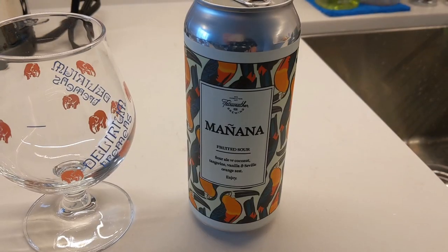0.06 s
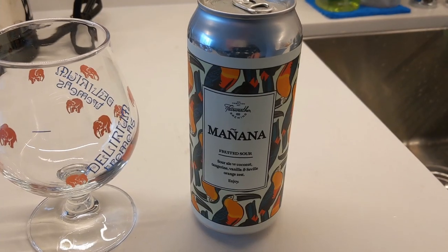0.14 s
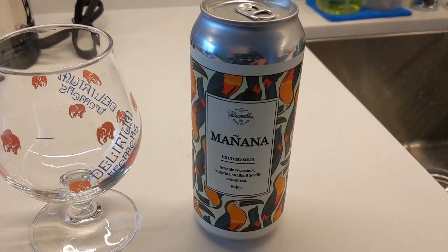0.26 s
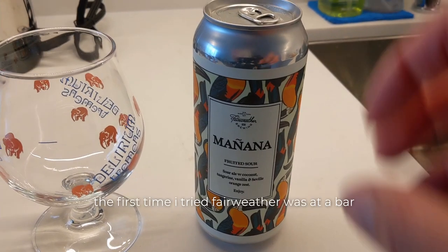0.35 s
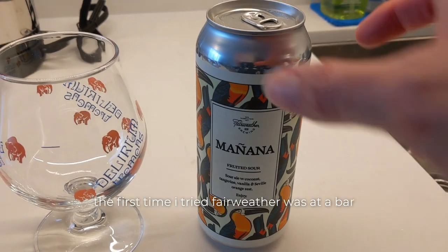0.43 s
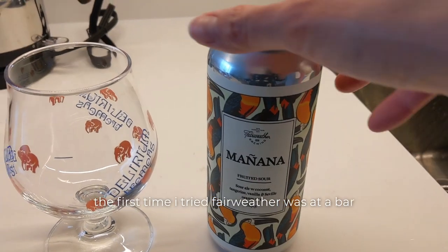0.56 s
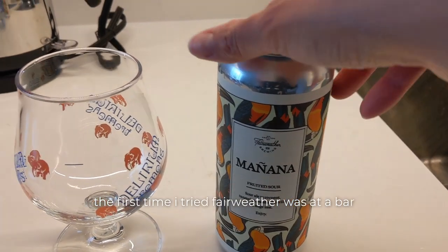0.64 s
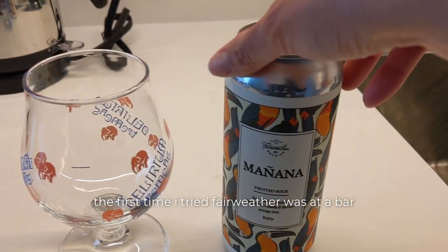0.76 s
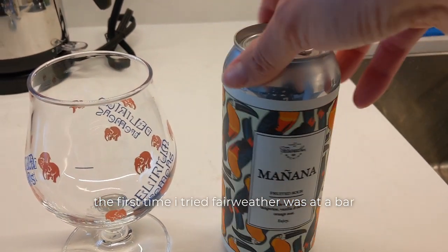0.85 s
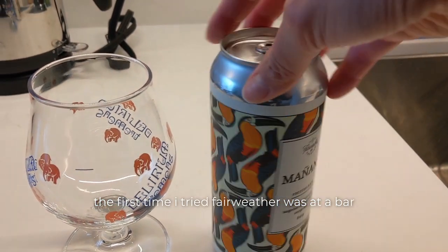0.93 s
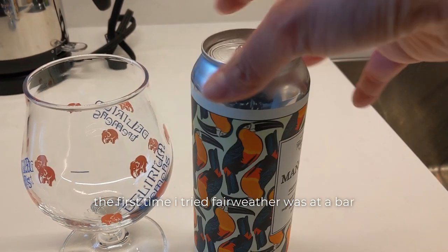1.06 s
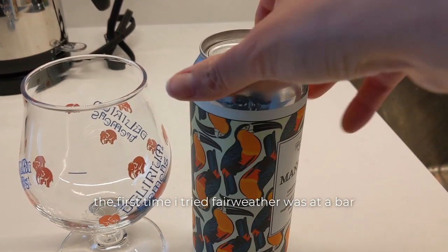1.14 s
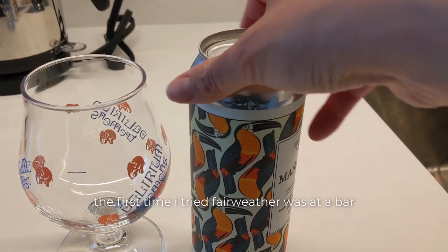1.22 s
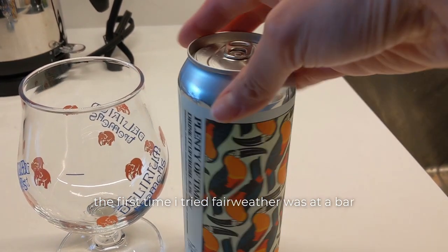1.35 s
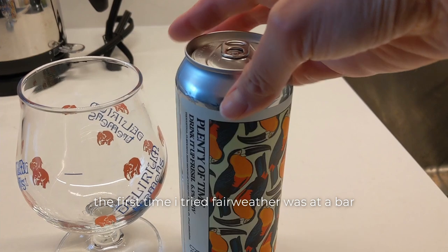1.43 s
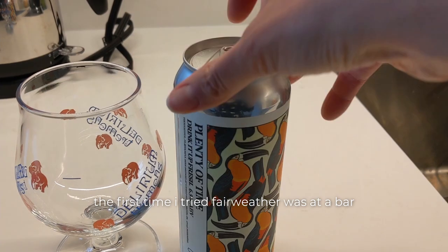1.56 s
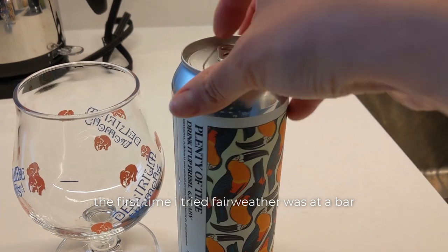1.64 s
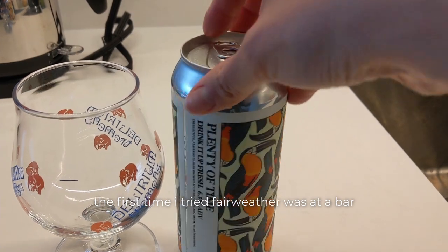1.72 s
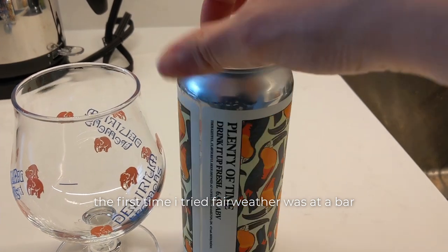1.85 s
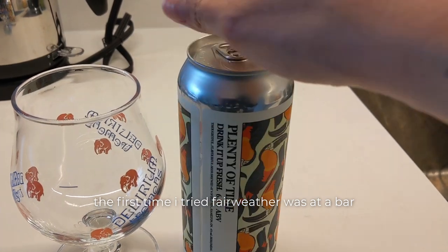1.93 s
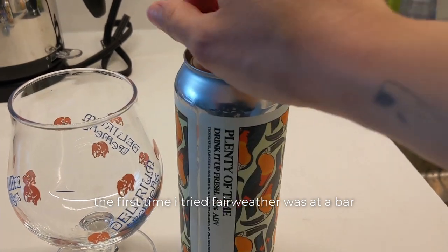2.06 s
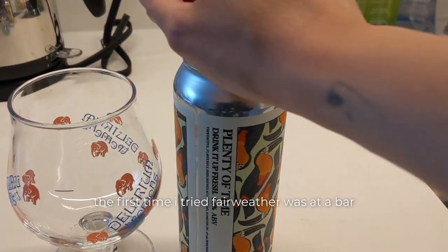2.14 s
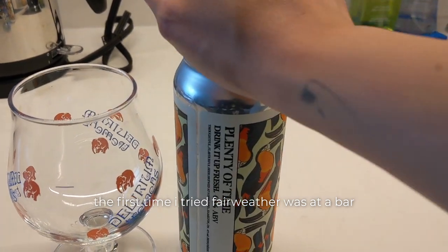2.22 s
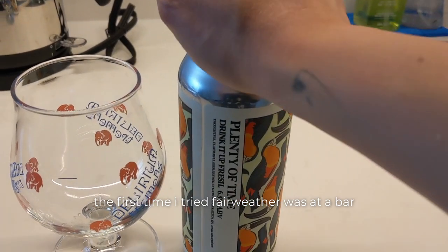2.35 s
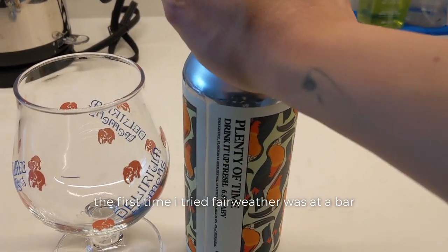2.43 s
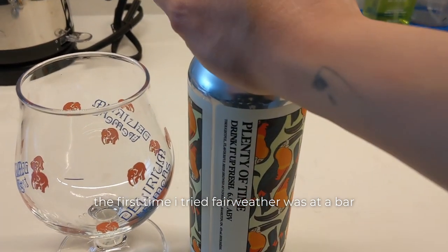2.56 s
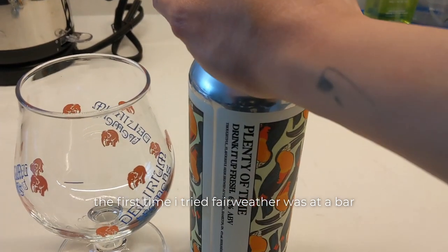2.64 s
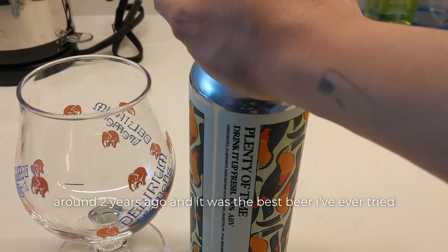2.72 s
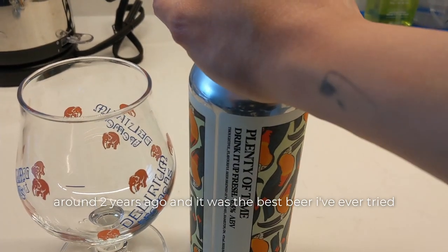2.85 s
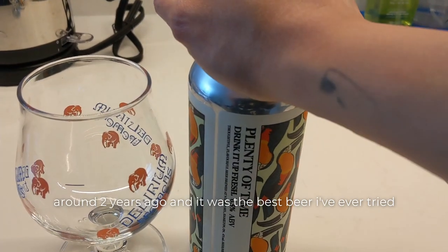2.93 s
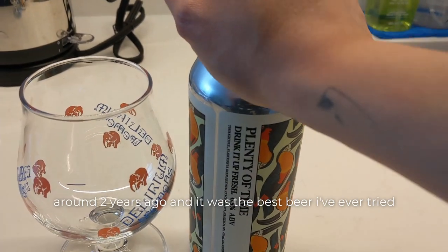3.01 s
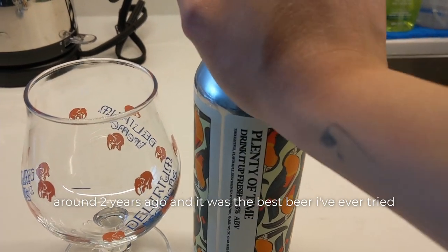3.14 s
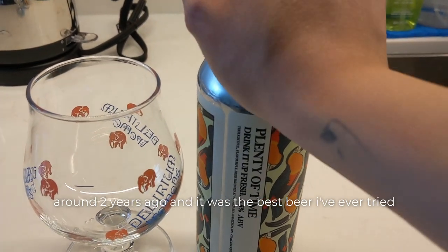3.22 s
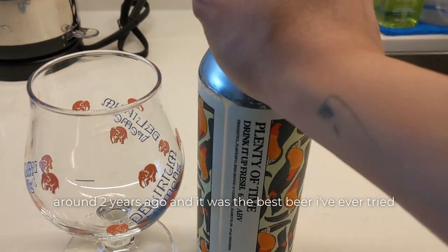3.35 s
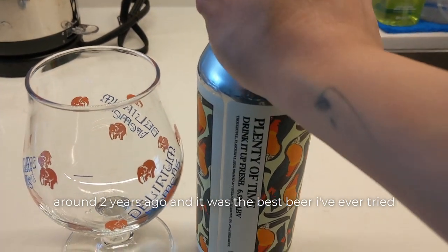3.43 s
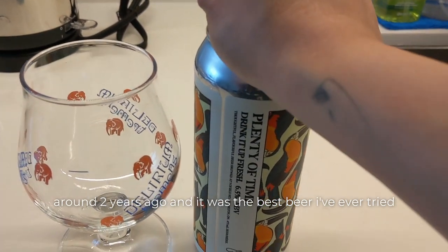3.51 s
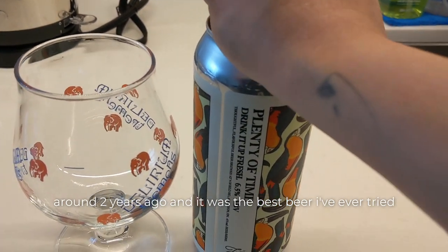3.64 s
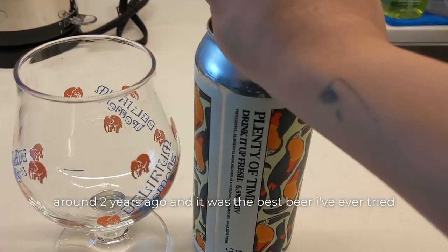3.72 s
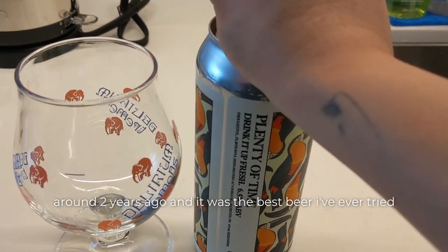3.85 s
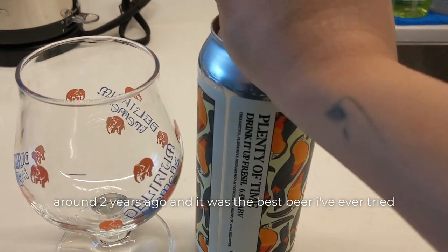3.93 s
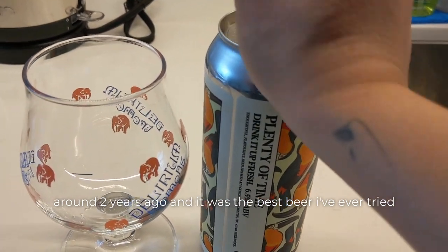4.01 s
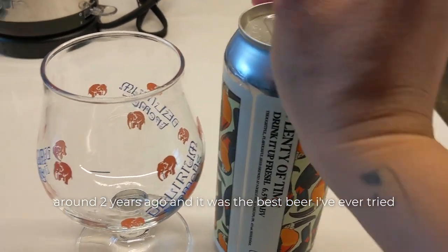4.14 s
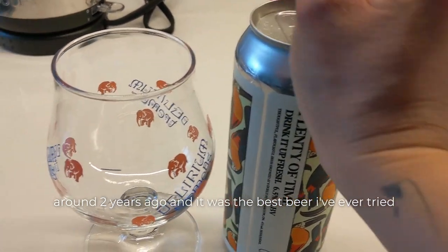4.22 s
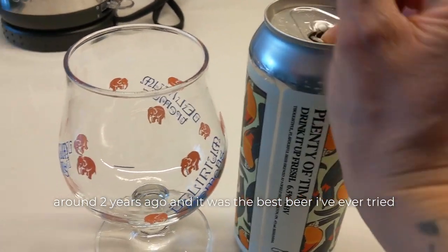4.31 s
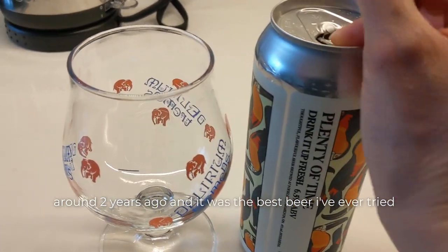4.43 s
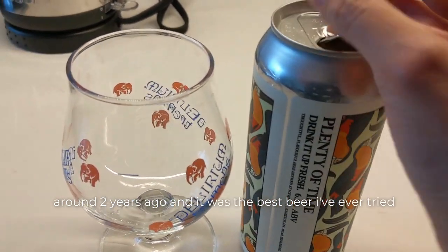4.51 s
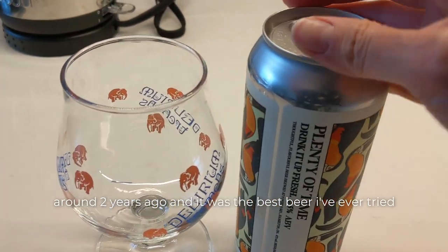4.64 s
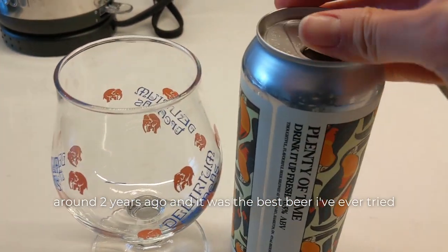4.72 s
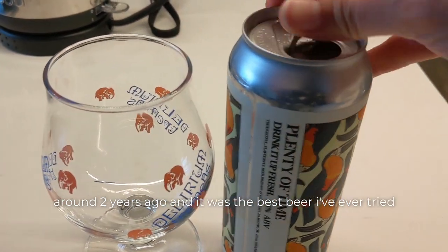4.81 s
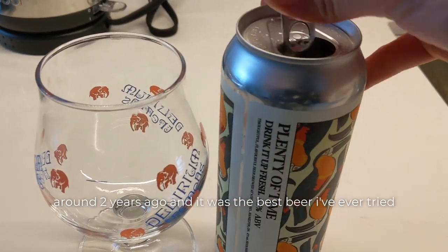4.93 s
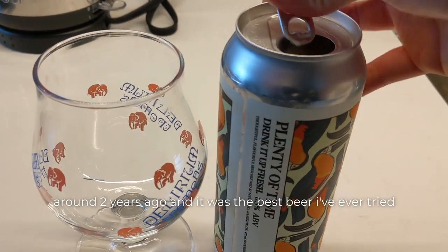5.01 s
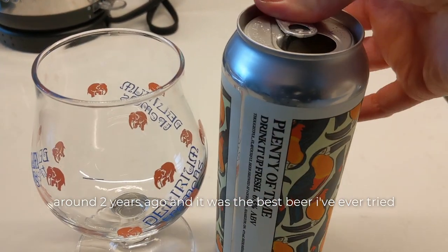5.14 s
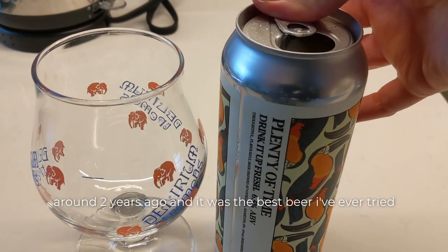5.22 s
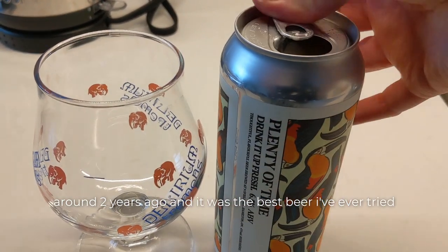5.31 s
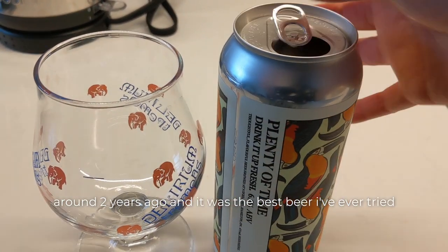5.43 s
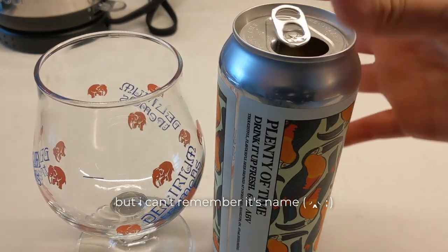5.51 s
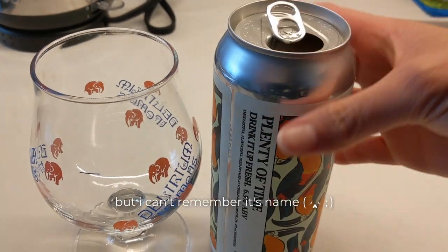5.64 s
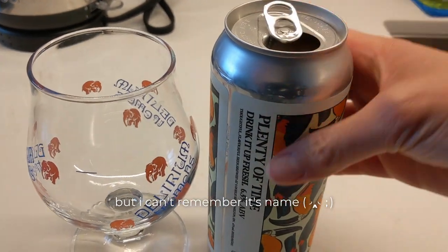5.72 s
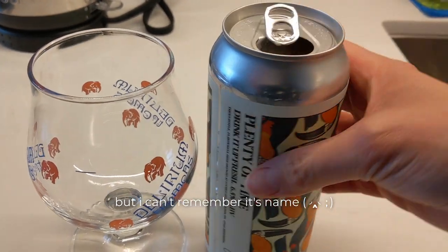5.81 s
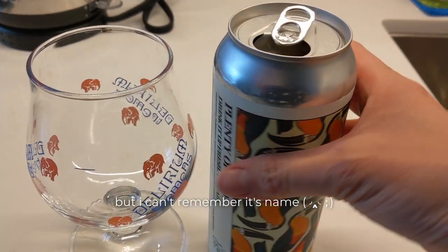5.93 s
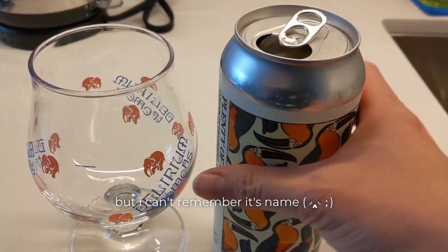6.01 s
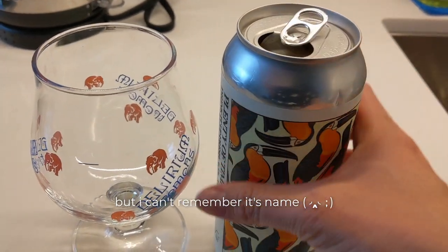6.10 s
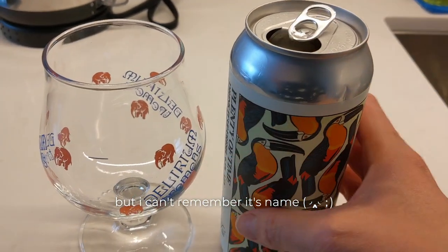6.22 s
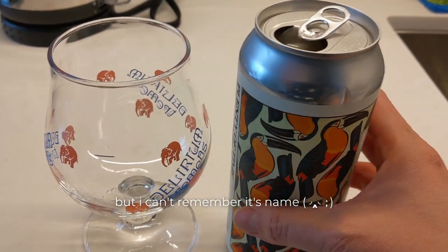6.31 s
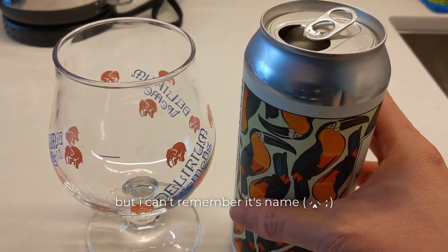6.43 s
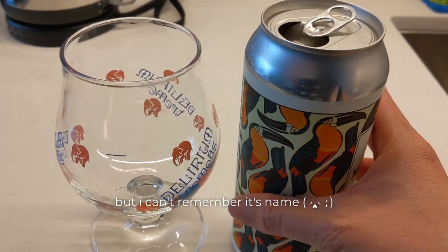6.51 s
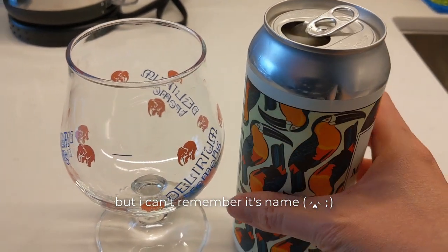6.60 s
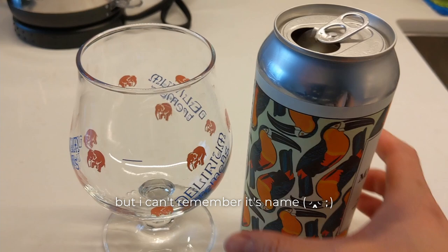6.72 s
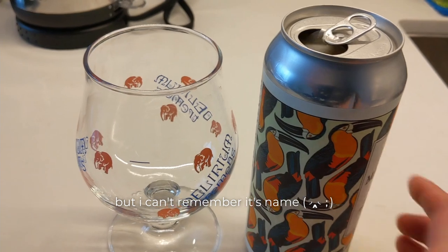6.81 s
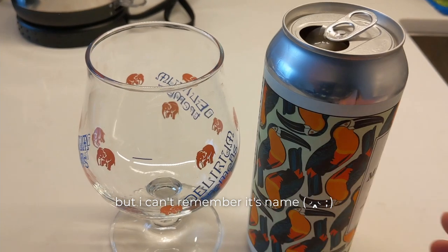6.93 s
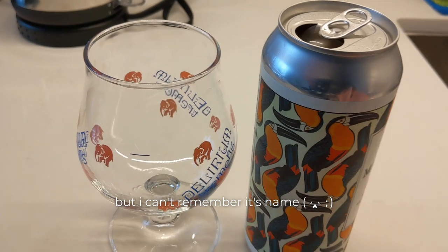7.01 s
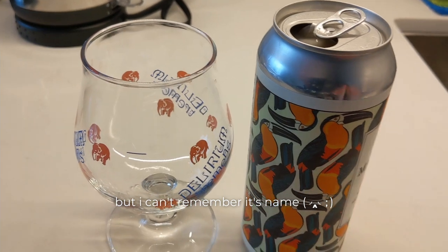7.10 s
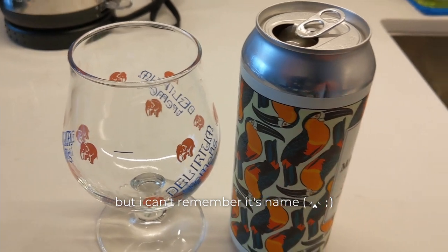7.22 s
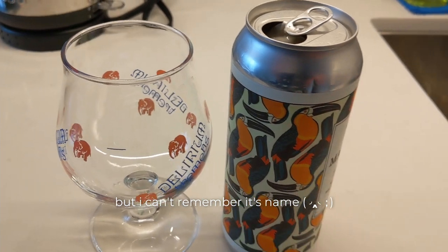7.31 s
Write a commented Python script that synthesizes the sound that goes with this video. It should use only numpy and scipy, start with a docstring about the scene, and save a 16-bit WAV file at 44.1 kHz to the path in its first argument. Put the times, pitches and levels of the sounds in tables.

```python
"""A full aluminium can, close by: a nail picks the tab, the seal cracks with a spit of gas, the lid tears and hisses.
Before that the can is turned on a kitchen counter; fingers brush it, and the opened beer fizzes faintly.
Contacts are pulses and random slips ringing modes of lid, wall, base and hollow; gas is coloured noise
plus a sinking narrow-band note; fizz and still air are filtered noise. A small room surrounds the can."""
import sys
import numpy as np
from scipy import signal
from scipy.fft import rfft, irfft
from scipy.io import wavfile

SR = 44100
rng = np.random.default_rng(int(sys.argv[2]) if len(sys.argv) > 2 else 0)


def unload_wav(signal):
    """Save mono or channel-first audio to the path in sys.argv[1] as 16-bit WAV at rate SR, clipped to [-1, 1]."""
    wavfile.write(
        sys.argv[1],
        SR,
        np.round(np.clip(np.atleast_2d(signal).T, -1, 1) * 32767).astype(np.int16),
    )


N = 324576
TIME = np.arange(N) / SR

# still kitchen: (frequency [Hz], level [dB])
AIR_SPECTRUM = [(12, -33.5), (20, -8), (44, -4.5), (65, -13), (134, -15.5), (193, -25), (367, -17.5),
                (527, -27), (718, -27), (1000, -32), (1090, -32), (1570, -34), (2200, -35.5), (5850, -36.5),
                (16000, -45)]
AIR_DB = -61  # before left/right offsets

# skin on the can: (swell centre [s], half length [s], level [dB], centre frequency [Hz])
SKIN_BRUSHES = [(0.421, 0.19, -68.5, 4460), (0.765, .07, -64, 5392), (2.2, 0.35, -61.5, 5400),
                (3.621, 0.098, -59, 1768), (4.748, 0.036, -53, 4360), (5.438, 0.055, -68, 6020),
                (5.821, 0.05, -54.5, 7930), (5.99, .16, -62, 1100), (6.024, 0.15, -59.5, 4520),
                (6.073, 0.16, -67, 6980), (6.21, 0.067, -62, 8010)]

# soft bumps of the can's weight: (time [s], peak level [dB], pitch [Hz])
WEIGHT_BUMPS = [(.879, -34.5, 130), (1.872, -37, 90), (2.85, -37, 150), (3.714, -43.5, 110),
                (3.846, -37.5, 160), (6.307, -45.5, 200)]

# can base on the counter: (frequency [Hz], width [Hz], level [dB])
BASE_MODES = [(158.3, 26, -3), (205, 12, 5.5), (264, 21, -3.5), (354, 25, 1), (442, 40, 3.5), (695, 31, -1),
              (1144, 92, -4), (1307, 130, -8.5)]
# base rim scraping on the counter: (frequency [Hz], width [Hz], level [dB])
RIM_MODES = [(2016, 135, -5.5), (2475, 115, -1.5), (2878, 110, 0), (3110, 96, -2.5), (4680, 1120, -6.5),
             (5290, 140, -1.5), (5660, 220, 2.5), (6680, 1540, -7.5), (11150, 1700, -17.5)]
# can turned by hand: (full speed reached [s], hold [s], level [dB], base grabs [s])
CAN_TURNS = [(0.952, 0.068, -44, .98), (1.351, 0.073, -48, 1.351), (1.716, 0.11, -59, 1.69)]
TURN_RISE_DB_PER_S, TURN_FALL_DB_PER_S = 196, 360
# shaking of the base while sliding and when it grabs, re the turn
SLIDE_DB, GRAB_DB, GRAB_DB_PER_S = -10.5, 4.5, 450
# last turn ends in a judder with a short rim squeal; the can rocks to rest
JUDDER_S, JUDDER_DB, JUDDER_FALL_DB_PER_S = 1.869, -26.5, 340
ROCK_DB, ROCK_FALL_DB_PER_S = -43, 68
SQUEAL_S, SQUEAL_DB, SQUEAL_RISE_DB_PER_S, SQUEAL_FALL_DB_PER_S = 1.878, -21.5, 1700, 1050

# nail and tab on the lid: (time [s], tick level [dB], grind T60 [s], hollow note [Hz],
#   hollow level [dB re tick], sharp edge level [dB re tick], lid left/right [dB]); layer offsets are added
TAB_TICKS = [ (1.06, -46.5, 0.043, 1980, -3.5, -1.5, -15), (1.247, -49.5, 0.11, 1920, -25, -4.5, -18),
             (1.6765, -32, 0.027, 1950, -17.5, -4, -6.5), (2.0364, -31, 0.0075, 1974, -19, -18, -21),
             (2.045, -45, .008, 1100, -10, 0.5, 5), (2.164, -57.5, .06, 1980, -1, -13, -10),
             (2.249, -46, .025, 1940, -9, -21, -12), (2.338, -43.5, 0.082, 2010, -14, -9.5, -11.5),
             (2.616, -18.5, 0.0076, 1886, -16, -10, -6.5), (2.7366, -29.5, 0.0097, 1760, -3, -22, -7),
             (2.8491, -13, .025, 1670, -21.5, -9.5, -3.5), (3.0639, -26.5, 0.023, 1230, -2.5, -12.5, -0.5),
             (3.262, -46.5, 0.033, 2022, -5, -2, -5), (3.589, -46, 0.027, 1670, -3.5, -10.5, -7),
             (3.696, -44, .05, 1800, -1, -9, -1), (3.703, -32, .02, 1950, -8.5, -5, -2),
             (3.7138, -11.5, 0.05, 1893, -20, -7.5, -1.5), (3.836, -26, 0.046, 1930, -6, -4, 0.5),
             (3.844, -14, 0.054, 1953, -5, -9.5, 0), (4.166, -40.5, 0.016, 1170, -3.5, -6, -19),
             (4.322, -39.5, .012, 1210, 6, 2, -25), (4.596, -51, 0.027, 1172, 2, -19, -8),
             (5.1748, -25, .002, 1430, -9, -4.5, -7), (5.415, -60, .01, 1420, -9, -5, -8),
             (5.4555, -60, .011, 1406, -3, -5, -5), (5.473, -60.5, .015, 1390, 7.5, -7, -12)]
# lid ring: (frequency [Hz], width before pinch [Hz], level before contact focus [dB])
LID_MODES = [(4300, 220, -1), (4970, 260, -2), (5338, 83, 0.5), (5770, 260, 1), (6146, 160, 0),
             (6780, 330, 0.5), (7500, 200, -9.5)]
# thin wall ring: (frequency [Hz], width [Hz], level [dB])
WALL_MODES = [(2510, 620, 0), (3140, 160, -2.4), (3270, 340, 1)]
# sharp edge of a tick or tear: (frequency [Hz], level [dB])
CRACK_SPECTRUM = [(200, -11), (900, -12), (4000, -10), (8500, -2), (11500, 0.5), (14000, -6), (16000, -11)]
# a harder or longer push stays longer on the lid and favours lower modes; centre at the reference push
CONTACT_REF_HZ, CONTACT_REF_DB, CONTACT_OCTAVES_PER_DB = 5850, -39.5, .006
CONTACT_REF_T60_S, CONTACT_T60_EXPONENT = .025, .06
# a push that reaches the hollow also shakes the wall
WALL_DB, WALL_DB_PER_HOLLOW_DB = -7.5, 0.65
# the hollow under the hand rings briefly and leaves a thin tone; higher notes leak faster; values at REF
HOLLOW_REF_HZ, HOLLOW_REF_WIDTH_HZ, LINGER_REF_WIDTH_HZ = 1200, 85, 12
LINGER_REF_DB, LINGER_DB_PER_OCTAVE = -1.5, -14

# gas as seal cracks, tab is levered up, lid tears: (time [s], first burst [dB], flow [dB], hold [s],
#   flow fall [dB/s], hollow note [Hz], share by which it sinks [1], note [dB re flow], note width [Hz])
GAS_VENTS = [(2.850, -22, -19, .028, 240, 1800, .28, -20, 240),
             (3.715, -28, -31.5, 0.0046, 210.5, 1960, 0.066, -19, 400),
             (3.846, -10.5, -19.8, .008, 112, 1000, 0.14, -16.5, 60)]
# first spit through the cracked seal: (frequency [Hz], level [dB])
SPIT_SPECTRUM = [(200, -35.5), (900, -43), (1600, -1.5), (2300, -25.5), (3400, 2.5), (3900, -11), (4500, 1),
                 (6000, 3), (7000, -3), (8500, -12), (11500, -6), (15700, -14)]
# gas rushing through the wider gap: (frequency [Hz], level [dB])
RUSH_SPECTRUM = [(150, -29.5), (330, -30), (410, -9.5), (470, -11.5), (550, -29.5), (1300, -21.5),
                 (1900, -3), (2600, -2.5), (3200, -7), (4200, 3.5), (5400, 1.5), (6500, -6.5),
                 (8000, -13.5), (10500, -16.5), (14000, -26), (16000, -33.5)]
ONSET_DB_PER_S = 20000  # a snap starts all but at once
BURST_FALL_DB_PER_S, NOTE_SINK_TIME_CONSTANT_S = 1100, .1
SEEP_DB, SEEP_FALL_DB_PER_S = -27, 41  # gas that goes on seeping, re the flow

# crackle of the tearing score line
TEAR_S, TEAR_DB, TEAR_RISE_DB_PER_S, TEAR_FALL_DB_PER_S = 3.845, -17.5, 2199.5, 429

# foam in the open can: (time [s], level [dB])
FIZZ_LEVEL = [(4.2, -86), (4.5, -65.5), (5.1, -62), (5.6, -66.5), (6.4, -64), (6.95, -62), (7.36, -69)]
# foam colour: (frequency [Hz], level [dB])
FIZZ_SPECTRUM = [(800, -5), (1200, -2), (2000, -11.5), (3300, 0), (4500, -1.5), (5800, 5.5), (8500, -12),
                 (11000, -11.5), (16000, -12.5)]

# room tail colour: (frequency [Hz], level [dB])
TAIL_SPECTRUM = [(100, -6.5), (1000, -1.5), (2000, -1), (5500, -4.5), (8000, -8.5), (16000, -5)]
# hand leaves the lid, the can is heard more directly: (time [s], room feed [dB re direct])
ROOM_FEED = [(4.4, 0), (4.9, -5)]
CUTOFF_HZ = 16000


def from_db(db):
    """Amplitude ratio of a level in dB."""
    return 10 ** (np.asarray(db) / 20)


def rms_one(x):
    """Scale to unit RMS."""
    return x / np.sqrt(np.mean(x ** 2) + 1e-20)


def level(rows):
    """Gain in time from (time [s], level [dB]) rows; -200 dB outside them."""
    s, db = np.transpose(rows)
    return from_db(np.interp(TIME, s, db, left=-200, right=-200))


def envelope(s, db, rise_db_per_s, fall_db_per_s, hold_s=0):
    """Gain that rises to its top at s, holds, then falls exponentially."""
    before = rise_db_per_s * np.maximum(s - TIME, 0)
    after = fall_db_per_s * np.maximum(TIME - s - hold_s, 0)
    return from_db(db - np.minimum(before + after, 200))


def add(track, s, sound):
    """Mix a short sound in at a time."""
    at = round(s * SR)
    track[..., at:at + sound.shape[-1]] += sound[..., :N - at]


def coloured(x, spectrum):
    """Causal (minimum-phase) filter with the given spectrum, built from its folded cepstrum."""
    hz, db = np.transpose(spectrum)
    size = 4096
    grid_hz = np.maximum(np.arange(size // 2 + 1) * SR / size, 1)
    gain = from_db(np.interp(np.log(grid_hz), np.log(hz), db))
    cepstrum = irfft(np.log(gain))
    cepstrum[1:size // 2] *= 2
    cepstrum[size // 2 + 1:] = 0
    response = irfft(np.exp(rfft(cepstrum)))
    return signal.fftconvolve(np.atleast_2d(x), response[None], axes=1)[:, :x.shape[-1]]


def high_pass(x, hz, order=2):
    """Small parts radiate little bass."""
    return signal.sosfilt(signal.butter(order, hz, "high", fs=SR, output="sos"), x)


def resonate(x, hz, width_hz):
    """One two-pole resonance, gain near 1 on top."""
    r = np.exp(-np.pi * width_hz / SR)
    zeros = np.array([1, 0, -1]) * (1 - r * r) / 2
    poles = [1, -2 * r * np.cos(2 * np.pi * hz / SR), r * r]
    return signal.lfilter(zeros, poles, x + 1e-18)


def body(x, modes):
    """Resonances in parallel, signs alternating."""
    return sum((-1) ** k * from_db(db) * resonate(x, hz, width_hz)
               for k, (hz, width_hz, db) in enumerate(modes))


def stereo_noise(likeness, size=N):
    """White noise that both sides partly share."""
    mid, side = rng.standard_normal((2, size))
    c = np.clip(likeness, 0, 1)
    return (np.sqrt(1 + c) * mid + np.sqrt(1 - c) * side * [[1], [-1]]) / np.sqrt(2)


def slips(per_s, spread_db, size=N):
    """Random tiny slips of uneven strength and either sign, at unit RMS."""
    happens = rng.random(size) < per_s / SR
    strength_db = spread_db * np.clip(rng.standard_normal(size), -2, 2)
    return rms_one(happens * from_db(strength_db) * rng.choice([-1, 1], size))


def flutter(per_s, depth_db):
    """Uneven grip: a gain gliding between random levels."""
    knots = np.clip(rng.standard_normal(4000), -2, 2)
    return rms_one(from_db(depth_db * np.interp(TIME * per_s, np.arange(len(knots)), knots)))


def still_air():
    """Steady, mostly low noise of the still kitchen."""
    stir = rms_one(coloured(stereo_noise(.65), AIR_SPECTRUM))
    return from_db(AIR_DB + np.array([[-.8], [1.2]])) * stir


def brushes(grain=1.8):
    """Soft swells of skin friction, with fine catches of the fingertips."""
    out = np.zeros((2, N))
    for s, half_s, db, hz in SKIN_BRUSHES:
        swell = np.hanning(int(2 * half_s * SR))
        friction = stereo_noise(0.88, size=len(swell)) + grain * slips(420, 4.0, size=len(swell))
        skin = rms_one(resonate(friction, hz, hz * .6))
        add(out, max(s - half_s, 0), from_db(db) * swell * skin)
    return out


def bumps(width_share=1.3):
    """Dull, quickly damped pushes on the counter."""
    out, push = np.zeros(N), signal.unit_impulse(SR // 10)
    for s, db, hz in WEIGHT_BUMPS:
        thud = resonate(push, hz, width_share * hz)
        add(out, s, from_db(db) * thud / np.abs(thud).max())
    return out


def dragging(base_db=-2.0, rim_db=-3.5, squeal_db=-1.0, clunk_db=-9.5):
    """The base sticks and slips on the counter, shaking the full can and its rim, which ring on between slips."""
    friction = slips(1900, 2.9) * flutter(110, 1.3)
    slide = sum(envelope(s, db, TURN_RISE_DB_PER_S, TURN_FALL_DB_PER_S, hold_s)
                for s, hold_s, db, _ in CAN_TURNS)
    grab = sum(envelope(grab_s, db + GRAB_DB, GRAB_DB_PER_S, GRAB_DB_PER_S)
               for _, _, db, grab_s in CAN_TURNS)
    judder = envelope(JUDDER_S, JUDDER_DB, ONSET_DB_PER_S, JUDDER_FALL_DB_PER_S)
    rock = envelope(JUDDER_S, ROCK_DB, ONSET_DB_PER_S, ROCK_FALL_DB_PER_S)
    chatter = envelope(SQUEAL_S, SQUEAL_DB, SQUEAL_RISE_DB_PER_S, SQUEAL_FALL_DB_PER_S)
    chatter = chatter * (TIME > JUDDER_S)

    def shaken(modes, gain):
        """Modes driven by gated friction, levelled by their ungated sound."""
        return body(friction * gain, modes) / np.std(body(friction, modes))

    base_gain = np.maximum(from_db(SLIDE_DB) * slide, grab) + judder + rock
    base = from_db(base_db) * shaken(BASE_MODES, base_gain)
    rim = from_db(rim_db) * shaken(RIM_MODES, slide + chatter)
    # hard juddering brings out an upper base mode and locks on to one rim mode
    clunk = from_db(clunk_db) * shaken(BASE_MODES[6:7], judder)
    squeal_hz = RIM_MODES[2][0]
    drive = np.sin(2 * np.pi * squeal_hz * TIME) * chatter * flutter(260, 3.6)
    squeal = from_db(squeal_db) * resonate(drive, squeal_hz, 140.0)
    return (base + clunk) * from_db([[1.2], [-1.2]]) + squeal + rim * from_db([[-3.0], [2.0]])


def ticks(overtone_db=-14.0, hollow_db=0.3, lid_db=-2.5, crack_db=-4.0, base_db=-26.5,
          focus_db_per_octave=19.0, grind_db=-17.0):
    """Each tick is a snap and a short grind, ringing lid, wall, base and the hollow under the hand."""
    out, t = np.zeros((2, N)), TIME[:SR // 5]
    attack = SR // 100  # samples over which levels are set
    snap = signal.unit_impulse(len(t))
    for s, tick_db, grind_t60_s, note_hz, depth_db, edge_db, pan_db in TAB_TICKS:
        # grind treble leaves the lid differently in each direction
        grit = np.array([slips(6000, 4.0, size=len(t)) for side in "LR"])
        force = snap + from_db(grind_db - 60 * t / grind_t60_s) * grit
        # the briefest snaps come from a firm pinch, which also damps the lid
        pinch_hz = 1.4 / grind_t60_s
        push_octaves = CONTACT_OCTAVES_PER_DB * (CONTACT_REF_DB - tick_db)
        briefness = (CONTACT_REF_T60_S / grind_t60_s) ** CONTACT_T60_EXPONENT
        centre_hz = CONTACT_REF_HZ * 2 ** push_octaves * briefness
        lid_modes = [(hz, width_hz + pinch_hz, db - focus_db_per_octave * abs(np.log2(hz / centre_hz)))
                     for hz, width_hz, db in LID_MODES]
        # the snap flexes the lid and pumps the air in the hollow
        higher = note_hz / HOLLOW_REF_HZ
        linger_db = LINGER_REF_DB + LINGER_DB_PER_OCTAVE * np.log2(higher)
        hollow = body(snap, [(note_hz, HOLLOW_REF_WIDTH_HZ * higher ** 2, 0),
                             (1750, 300, overtone_db),
                             (note_hz, LINGER_REF_WIDTH_HZ * higher ** 2, linger_db)])
        hollow = high_pass(hollow, .75 * note_hz, order=3)
        base = body(snap, BASE_MODES[3:5])
        wall = high_pass(body(force, WALL_MODES), 1400)
        lid = high_pass(body(force, lid_modes), 1800)
        edge = coloured(force, CRACK_SPECTRUM)
        # (sound, level [dB re tick], left/right [dB])
        parts = [(hollow, depth_db + hollow_db, 4.0),
                 (base, depth_db + base_db, 2.5),
                 (wall, WALL_DB + WALL_DB_PER_HOLLOW_DB * depth_db, -1.5),
                 (lid, lid_db, pan_db),
                 (edge, edge_db + crack_db, -1.2)]
        for sound, db, side_db in parts:
            sides = rms_one(from_db(np.array([[side_db], [-side_db]]) / 2))
            add(out, s, sides * from_db(tick_db + db) * sound / np.std(sound[..., :attack]))
    return out


def gas(vent, spectrum, likeness=0.28):
    """A turbulent jet bursts through the slit and dies away; its hollow note sinks as the gap widens."""
    s, burst_db, flow_db, hold_s, fall_db_per_s, start_hz, sink_share, note_db, note_width_hz = vent
    burst = envelope(s, burst_db, ONSET_DB_PER_S, BURST_FALL_DB_PER_S)
    stream = envelope(s, flow_db, ONSET_DB_PER_S, fall_db_per_s, hold_s)
    seep = envelope(s, flow_db + SEEP_DB, ONSET_DB_PER_S, SEEP_FALL_DB_PER_S)
    jet = rms_one(coloured(stereo_noise(likeness) + 0.5 * slips(1500, 3.5), spectrum))
    sunk = 1 - np.exp(-np.maximum(TIME - s, 0) / NOTE_SINK_TIME_CONSTANT_S)
    note_hz = start_hz * (1 - sink_share * sunk)
    # slow complex noise on a gliding carrier gives a note of the set width
    r = np.exp(-np.pi * note_width_hz / SR)
    sway = signal.lfilter([1 - r], [1, -r], rng.standard_normal(N) + 1j * rng.standard_normal(N))
    note = rms_one(np.real(sway * np.exp(2j * np.pi * np.cumsum(note_hz) / SR)))
    return (burst + stream + seep) * (jet + from_db(note_db) * note * from_db([[2.2], [-2.2]]))


def tearing():
    """The score line gives way in a run of tiny cracks."""
    cracks = rms_one(coloured(slips(2500, 8.0), CRACK_SPECTRUM))
    return envelope(TEAR_S, TEAR_DB, TEAR_RISE_DB_PER_S, TEAR_FALL_DB_PER_S) * cracks


def fizz():
    """Countless small bubbles burst in the can: noise with random pops."""
    bubbles = stereo_noise(0.66) + .5 * slips(900, 3.2)
    return level(FIZZ_LEVEL) * rms_one(coloured(bubbles, FIZZ_SPECTRUM))


def kitchen(x, early_db=-4.0, early_t60_s=.04, early_cut_hz=1500.0, tail_db=-12.0, tail_t60_s=.45):
    """Quick bright reflections off counter, glass and hand, then the tail of the room."""
    t = TIME[:SR * 3 // 4]
    early = high_pass(stereo_noise(0, size=len(t)), early_cut_hz)
    early = early * from_db(-60 * t / early_t60_s) * (t > .0004)
    tail = coloured(stereo_noise(0.13, size=len(t)), TAIL_SPECTRUM)
    tail = tail * from_db(-60 * t / tail_t60_s) * (1 - np.exp(-t / 0.0048))
    response = (from_db(early_db) * rms_one(early) + from_db(tail_db) * rms_one(tail)) / np.sqrt(len(t))
    scattered = x * from_db(np.interp(TIME, *np.transpose(ROOM_FEED)))
    return x + signal.fftconvolve(scattered, response, axes=1)[:, :N]


def scene():
    """Handling and escaping gas sound into the kitchen; foam and still air lie underneath."""
    handling = brushes() + bumps() + dragging() + ticks()
    spit, leak, rush = GAS_VENTS
    escaping = gas(spit, SPIT_SPECTRUM) + gas(leak, RUSH_SPECTRUM) + gas(rush, RUSH_SPECTRUM)
    return kitchen(handling + escaping + tearing()) + fizz() + still_air()


def record(dry, port_hz=5620.0, port_width_hz=1700.0, ceiling=.85):
    """A treble resonance is cut left and added right; right lags 4 samples; peaks rounded, top cut."""
    port = resonate(dry, port_hz, port_width_hz)
    left = dry[0] - .6 * port[0]
    right = np.roll(dry[1] + .65 * port[1], 4)
    rounded = ceiling * np.tanh(np.array([left, right]) / ceiling)
    return signal.sosfilt(signal.ellip(10, .1, 80, CUTOFF_HZ, fs=SR, output="sos"), rounded)


dry = scene()
out = record(dry)
unload_wav(out)
```